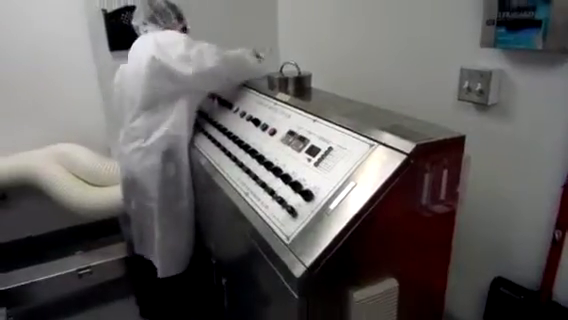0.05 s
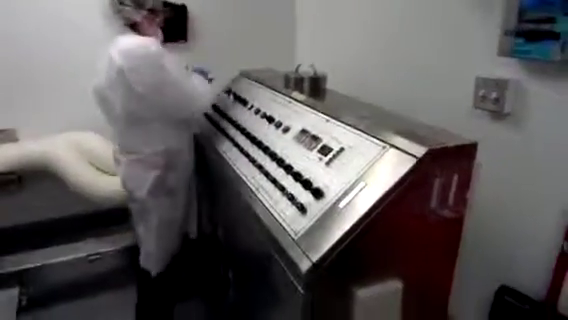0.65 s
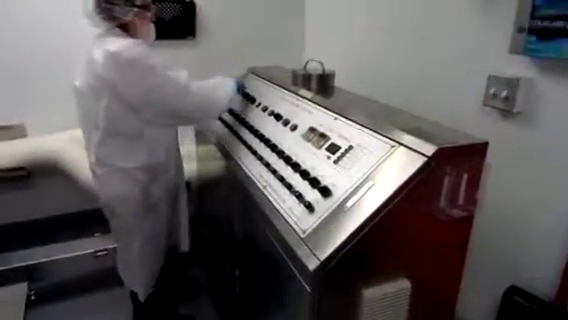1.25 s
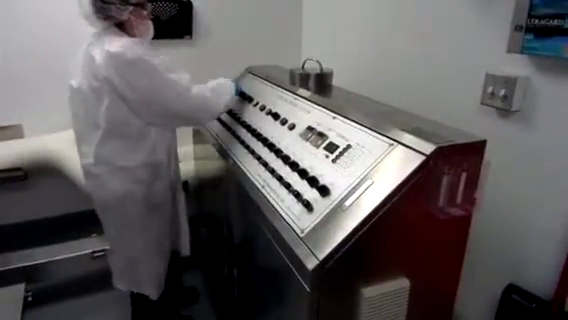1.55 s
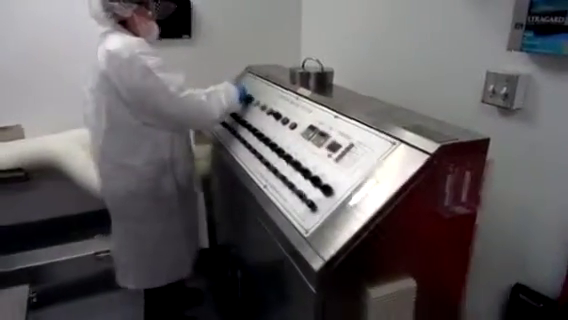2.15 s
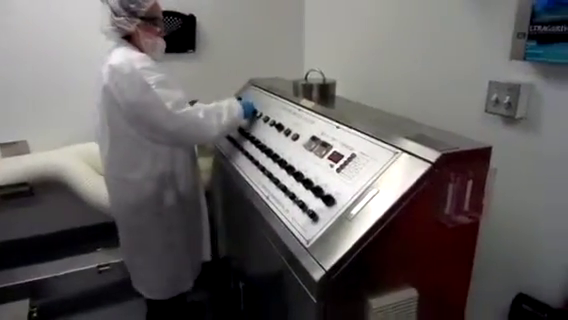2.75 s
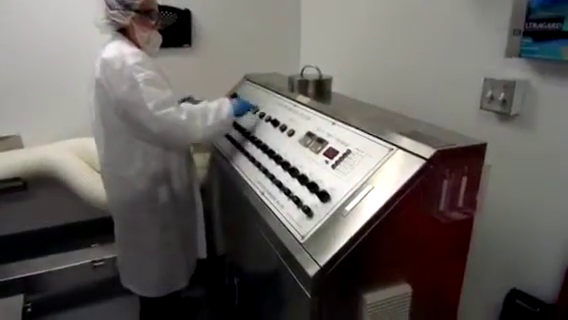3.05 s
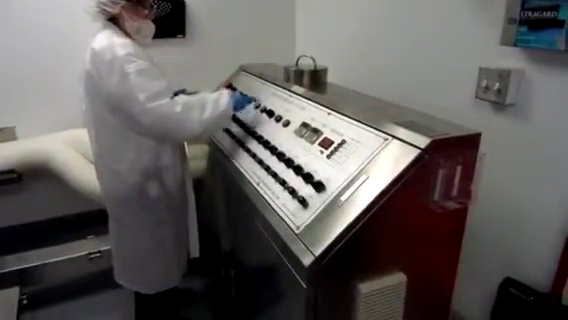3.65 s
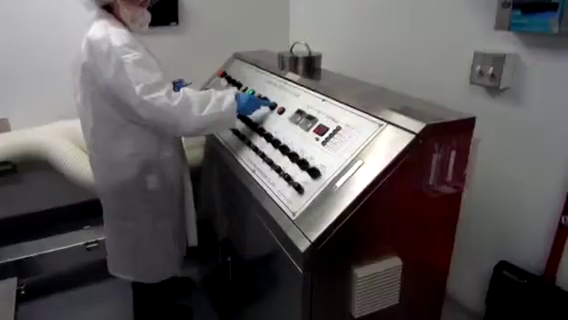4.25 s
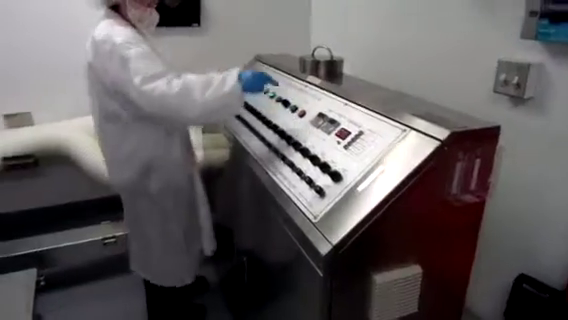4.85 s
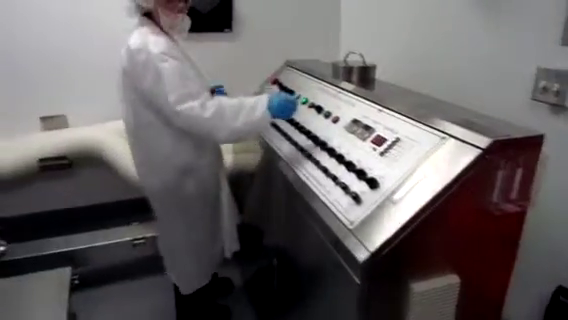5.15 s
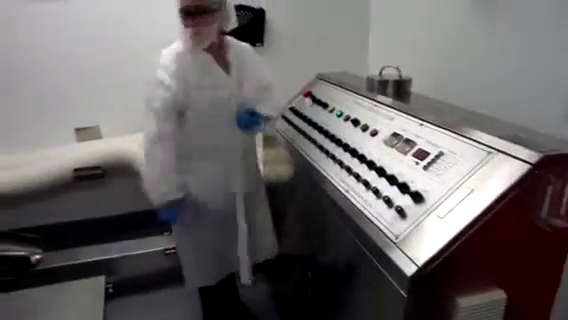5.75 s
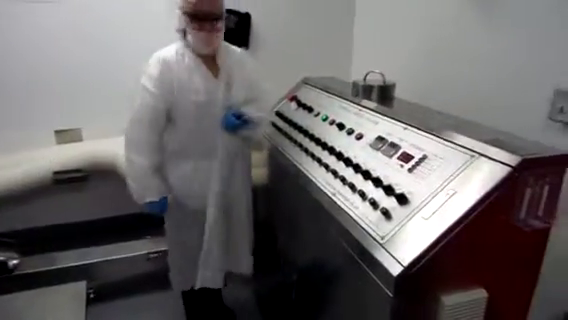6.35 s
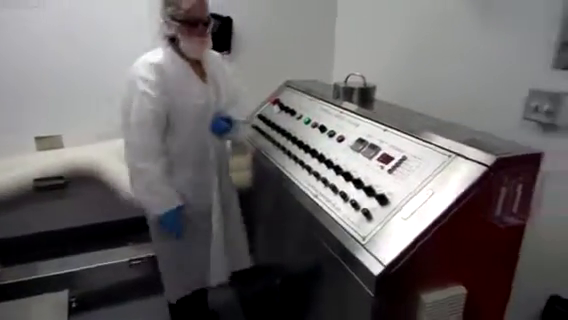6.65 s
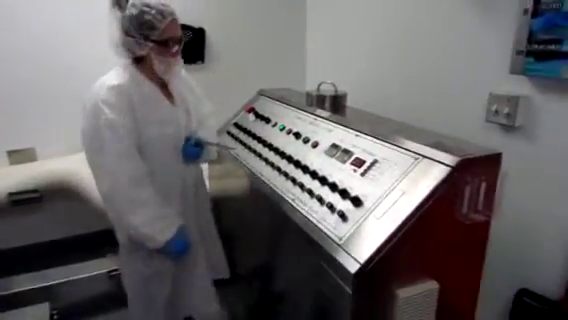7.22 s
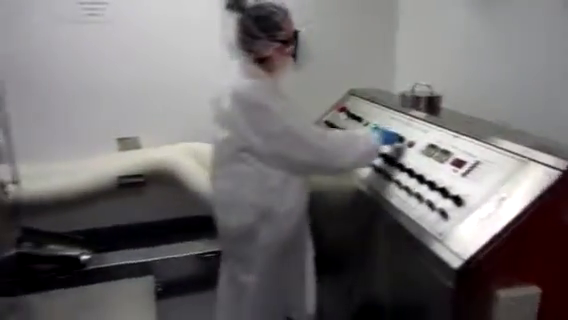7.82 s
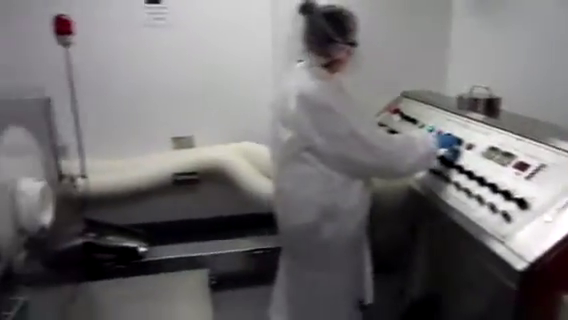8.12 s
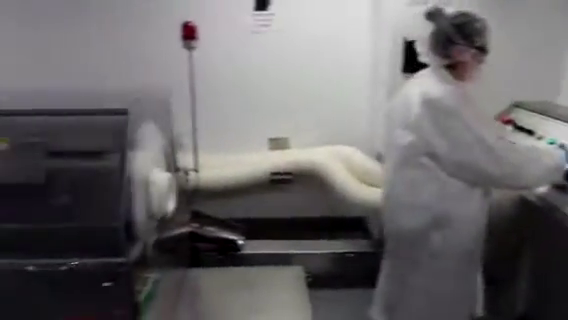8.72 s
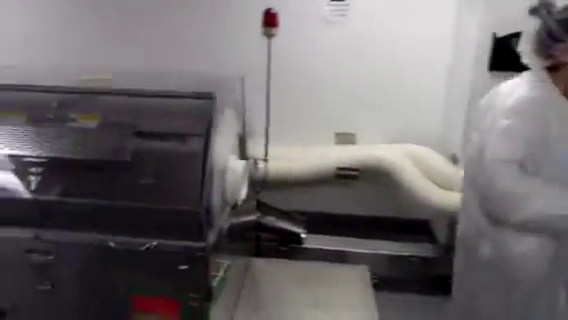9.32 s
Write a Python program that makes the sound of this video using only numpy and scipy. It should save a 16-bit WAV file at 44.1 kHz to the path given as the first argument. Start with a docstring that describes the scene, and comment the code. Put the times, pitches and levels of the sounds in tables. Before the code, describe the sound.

A brief rush of air gives way to the muffled hum and fan whine of an industrial dryer in a small room. From 0.2 to 0.4 seconds, sharp switch clicks and dull knocks shake a steel control desk, with the heaviest thump at about 0.35. The hum dips, then creeps back. A gown rustles faintly, and lighter clicks come at about 0.8, 1.4 and 2 seconds. Around 2.3 seconds, more knocks and a tiny zipping squeak cut the hum almost to silence. It slowly returns under very faint glove scrapes on knobs. At 4 seconds, a click and knock suddenly open the sound into a much louder blower: a steady roar with airy hiss, motor hum and a thin whistle. From about 8.3 seconds the rush surges briefly and keeps growing slightly while the tones sink into it.

```python
"""Industrial dryer and control desk

A dryer hums in a small factory room while an operator in a paper gown works its steel control desk.
Switches click, the desk knocks and shudders, a glove scrapes the knobs. After the early knocks the
hum and rustle duck, then creep back at a steady rate. Motor and fan start muffled; at four seconds
the sound opens into the rush of the blower, which swells to a steady roar."""
import sys
import numpy as np
from scipy import signal
from scipy.fft import rfft, irfft, next_fast_len
from scipy.io import wavfile

SR = 44100
rng = np.random.default_rng(int(sys.argv[2]) if len(sys.argv) > 2 else 0)


def store_wav(level_fs):
    """Save 16-bit WAV to argv[1]."""
    pcm = np.round(np.clip(np.atleast_2d(level_fs), -1, 1) * 32767)
    wavfile.write(sys.argv[1], SR, pcm.T.astype(np.int16))


N = 413658

# motor hum, two close lines that beat, and casing tones: f/Hz, muffled level/dB, open level/dB
MOTOR_LINES = [(117.9, -47, -47.5), (120.4, -42, -41.5), (221.7, -53, -57), (232.6, -50.5, -44),
               (361, -60.5, -64)]
# blade-passing harmonics, first to third: muffled level/dB, open level/dB
BLADE_HARMONICS = [(-38.5, -37.5), (-46.5, -44.5), (-45.5, -47.5)]
# fader ride on the muffled third blade harmonic: t/s, gain/dB
WHINE_RIDE = [(0, -1), (.3, -2.5), (.9, 1.5), (1.2, -3.5), (1.45, -2.5), (2.2, -1.5), (2.35, -13),
              (2.9, -6), (3.15, 3.5), (3.901, 2)]
# noise colours: f/Hz, relative level/dB
DULL_AIR_COLOUR = [(25, -9), (60, -8), (110, -7), (170, -1.5), (250, -2), (320, -7.5), (430, -12.5),
                   (540, -4), (700, -10.5), (830, -10), (1050, -25), (1500, -34.5), (5000, -44.5),
                   (15000, -54)]
ROAR_COLOUR = [(25, -14.5), (50, -12), (78, -3), (115, -3), (150, -4), (230, 1), (350, -3.5), (450, -2.5),
               (620, -5), (1000, -4), (1500, -7.5), (2200, -13), (4000, -27.5), (9000, -43)]
HISS_COLOUR = [(800, -37.5), (2000, 1), (3200, 2), (5000, -0.5), (7000, 0), (10000, -2), (13000, -3),
               (15500, -8)]
CLOTH_COLOUR = [(600, -6.5), (1100, -2), (1500, -7), (2050, 1.5), (2700, -2.5), (3500, 0), (4400, -11),
                (5200, -13.5), (8000, -19), (11000, -31.5), (16000, -32)]
RUMBLE_COLOUR = [(30, -19), (70, 6.5), (130, 9), (250, 5.5), (400, -6), (700, -15), (1200, -16),
                 (2000, -33), (5000, -61)]
# peaks and notches of the casing and the duct: f/Hz, width/Hz, gain/dB
CASING_BANDS = [(2200, 320, 8), (3220, 320, 4.5)]
DUCT_BANDS = [(61.8, 13, -13.5), (86.6, 18, 1.5), (186, 27, 5), (244, 14, 2), (319, 9.4, 6.5),
              (352.4, 9.9, 8), (382.7, 15, 5), (459, 23, -8), (557, 23, 4.5), (636, 19, 4), (740, 54, 2.5),
              (842, 42, 1), (1200, 17, 3), (2450, 17, -1)]
# gown and gloves brushing the desk: t/s, length/s, level/dB, treble lift/dB, relative rumble/dB
RUBS = [(0.17, 0.067, -50.5, 10, 6), (0.263, 0.16, -42.5, -16, 2.5), (0.79, 0.12, -55.5, -2, -8),
        (1.032, 0.032, -63, 5, -6), (1.548, 0.019, -55.5, 2, -6), (1.965, 0.11, -56.5, -1, -4),
        (2.157, 0.067, -55, 8, 3), (3.27, .04, -52.5, 3, 18), (3.734, 0.27, -53, -4, 13.5),
        (3.867, 0.12, -69, -3, 11)]
# switch clicks, hard taps and light ticks: t/s, level/dB, f/Hz, width/octaves, t60/s, relative crack/dB
CLICKS = [(0.1666, -24, 3100, 1.15, 0.018, -3.5), (0.1725, -36, 3100, 0.72, .012, -1),
          (.1955, -42, 3800, 1.4, .012, -6), (0.203, -34, 2000, 1.8, 0.012, -9),
          (.209, -44, 4200, 1.1, .02, -6), (0.221, -43, 3900, 1, .014, -10),
          (0.2932, -35, 3230, 0.43, 0.012, -13), (.339, -28.5, 2410, 0.7, 0.013, -30.5),
          (0.3492, -29.5, 3000, 1.5, 0.0064, -28), (0.3509, -21, 1960, 0.51, 0.012, -36),
          (0.349, -25, 1200, .5, 0.02, -38), (.369, -45, 4530, 1.4, 0.0068, 6),
          (.379, -45, 2000, 1.7, .012, -19), (0.3986, -29, 2520, 1.33, 0.01, -16),
          (.6379, -60, 2400, 0.9, .025, -10), (.7202, -64, 2200, 1.1, .003, 1),
          (0.8002, -43.5, 2570, 1, 0.019, -23), (0.8077, -41.5, 2620, 0.79, 0.037, -29),
          (0.9847, -54, 2300, 1.4, 0.017, -14), (1.259, -54, 2000, 1.5, .006, -6),
          (1.279, -57, 3000, 1.1, .003, 2), (1.408, -39.5, 1780, 0.75, 0.015, -27),
          (2.006, -32, 3540, .8, 0.011, -11), (2.1647, -46, 2405, 1.1, .01, -9.5),
          (2.9497, -66, 2600, 1.7, 0.0027, 0), (3.5074, -67, 2600, 2, 0.0027, 0),
          (3.8095, -61.5, 3250, .3, 0.017, -31), (3.9867, -56, 3100, 0.75, 0.1, -18),
          (4.0092, -29, 595, 1.06, 0.016, -30), (4.012, -38, 2100, 0.85, .012, -17),
          (4.015, -44, 2600, 1.8, .008, -12), (4.0176, -39, 3400, 1.5, 0.007, -14),
          (4.024, -51, 6900, 0.92, 0.23, -14)]
# the desk shaking around the knocks: t/s, length/s, level/dB, relative body/dB
SHUDDERS = [(.171, 0.043, -34, -10), (0.215, 0.082, -42, -17), (0.293, 0.051, -30, -6),
            (0.364, 0.037, -34.5, -10), (2.245, .042, -40, -12), (3.992, 0.027, -38, -3)]
# dull knocks on the desk: t/s, level/dB, contact cut-off/Hz
KNOCKS = [(.174, -26, 300), (0.205, -27, 200), (.3075, -28.5, 500), (0.336, -23, 400), (.3528, -10, 190),
          (0.369, -16, 158), (.381, -15, 170), (0.3961, -19.5, 120), (2.254, -25, 110), (2.274, -35, 139.6),
          (2.2892, -19.5, 172), (3.988, -30, 220), (4.0093, -28, 500)]
# modes of the desk panel: f/Hz, relative level/dB, t60/s
DESK_MODES = [(72, -3, .03), (115, 1, .035), (185, -3, .035), (255, -4, .035), (380, -4, .03),
              (560, -8, .025), (900, -14, .02)]
# ducks after hard knocks: t/s, level at the bottom/dB
DUCKS = [(.21, -9.5), (.37, -14), (2.292, -30)]
# glove on the knobs: t/s, length/s, level before ducking/dB, f/Hz, width/Hz, relative knob body/dB
SCRAPES = [(0.817, 0.065, -58, 4400, 900, -14), (0.896, .03, -56, 3180, 600, -8),
           (1.042, 0.019, -55, 2330, 500, 0), (2.022, 0.072, -69, 3200, 700, -10),
           (2.163, .025, -56, 2250, 500, -12), (2.197, 0.049, -49, 3300, 1300, -11),
           (2.465, .04, -59, 3000, 1200, -10), (2.66, 0.092, -60, 3420, 700, -2),
           (2.788, 0.076, -61, 3500, 1210, -5), (2.892, .04, -59, 3600, 904, -7),
           (2.998, .038, -53.5, 3660, 450, 0), (3.05, 0.068, -49.5, 2950, 1100, -10),
           (3.123, 0.1, -48.5, 3130, 1500, -3)]
# tiny buzzy zips: t/s, length/s, start f/Hz, end f/Hz, level/dB
ZIPS = [(2.254, 0.0086, 7150, 1990, -40), (2.262, 0.0034, 1290, 1900, -40),
        (2.2943, 0.00204, 1400, 1350, -38)]

OPEN_S, OPEN_FADE_S = 4.004, 0.0089   # crossfade from muffled to open
# as the microphone turns towards the dryer, the rush gains and the tones sink into it
TURN_S, RUSH_RISE_DB_PER_S, TONE_FADE_DB_PER_S = 8.34, 1.5, 4


def from_db(db):
    """Decibels to gain."""
    return np.exp(np.log(10) / 20 * np.asarray(db))


def rms_one(x):
    """Scale to unit rms."""
    return x / np.sqrt(np.mean(x ** 2) + 1e-20)


def seconds():
    """The time of every sample."""
    return np.arange(N) / SR


def add(out, s, sound):
    """Mix a sound in at time s."""
    at = round(s * SR)
    out[at:at + len(sound)] += sound[:N - at]


def ramp(s, length):
    """A linear fade from 0 to 1, starting at time s."""
    return np.clip((seconds() - s) / length, 0, 1)


def stroke(s, length, attack_s, release_s):
    """The envelope of one gesture: it takes hold, sustains and dies away."""
    out, t = np.zeros(N), np.arange(int((length + 10 * release_s) * SR)) / SR
    add(out, s, np.minimum(t / attack_s, 1) * np.exp(-np.maximum(t - length, 0) / release_s))
    return out


def drift(rate_hz):
    """A smooth random modulator, rms 1."""
    hop, settle = 40, 2000
    r = np.exp(-2 * np.pi * rate_hz * hop / SR)
    slow = signal.lfilter([1], [1, -2 * r, r * r], rng.standard_normal(N // hop + settle + 2))[settle:]
    return np.interp(np.arange(N) / hop, np.arange(len(slow)), rms_one(slow))


def noise(colour):
    """A steady noise bed of a given colour, rms 1."""
    size = next_fast_len(N)
    hz, db = np.transpose(colour)
    bins = np.maximum(np.fft.rfftfreq(size, 1 / SR), 1)
    gain = from_db(np.interp(np.log(bins), np.log(hz), db)) * np.minimum(bins / hz[0], 1)
    return rms_one(irfft(rfft(rng.standard_normal(size)) * gain, size)[:N])


def fading_noise(t60, size):
    """White noise that dies away."""
    return rng.standard_normal(size) * np.exp(-np.log(1000) * np.arange(size) / SR / t60)


def butter(x, hz, kind, order=2):
    """A low-, high- or band-pass with its edges kept in range."""
    sections = signal.butter(order, np.clip(hz, 10, .45 * SR), kind, fs=SR, output="sos")
    return signal.sosfilt(sections, x + 1e-18)


def ring(x, hz, t60):
    """One mode: a unit impulse starts a decaying sine of height 1."""
    r, w = from_db(-60 / (t60 * SR)), 2 * np.pi * hz / SR
    return signal.lfilter([0, np.sin(w)], [1, -2 * r * np.cos(w), r * r], x + 1e-18)


def resonance(x, hz, width):
    """A band-pass with unity gain at its peak."""
    r, w = np.exp(-np.pi * width / SR), 2 * np.pi * hz / SR
    return signal.lfilter((1 - r * r) / 2 * np.array([1, 0, -1]), [1, -2 * r * np.cos(w), r * r], x)


def equalise(x, bands):
    """Boost or cut narrow bands of a noise; rms 1."""
    return rms_one(x + sum((from_db(db) - 1) * resonance(x, hz, width) for hz, width, db in bands))


def tone(hz, waver_db, flutter):
    """A machine line: it wavers in the room's standing waves and flutters in the air stream."""
    phase = 2 * np.pi * (np.cumsum(hz * np.ones(N)) / SR + rng.random())
    height = np.sqrt(2) * from_db(waver_db * drift(0.51))
    return (height + flutter * drift(9.8)) * np.sin(phase) + flutter * drift(4.2) * np.cos(phase)


def motor(muffled, opened):
    """Beating motor hum and casing tones; higher lines flutter more."""
    out = 0
    for hz, muffled_db, open_db in MOTOR_LINES:
        gain = muffled * from_db(muffled_db) + opened * from_db(open_db)
        out += gain * tone(hz, waver_db=-0.26, flutter=hz / 900)
    return out


def fan(muffled, opened, blade_hz=269.4):
    """Passing blades sing in harmonics, steadier when muffled and rougher in the rush."""
    hz = blade_hz * (1 + 0.00061 * drift(0.77))
    whine_db = np.interp(seconds(), *np.transpose(WHINE_RIDE))
    out = 0
    for k, (muffled_db, open_db) in enumerate(BLADE_HARMONICS, 1):
        ride_db = whine_db if k == 3 else 0
        out += muffled * from_db(muffled_db + ride_db) * tone(k * hz, waver_db=-0.3, flutter=0.19 * k)
        out += opened * from_db(open_db) * tone(k * hz, waver_db=1.3, flutter=0.36 * k)
    return out


def dull_air():
    """A muffled bed of air noise, coloured by the casing."""
    return from_db(-42) * equalise(noise(DULL_AIR_COLOUR), CASING_BANDS)


def blower(rush):
    """Duct turbulence roars and hisses: it leaks through at first, is shut out, then opens fully."""
    leak = stroke(0, length=.205, attack_s=1 / SR, release_s=0.0098)
    duct = equalise(noise(ROAR_COLOUR), DUCT_BANDS)
    swell = from_db(-11) * stroke(8.35, length=0.45, attack_s=.12, release_s=0.08)
    mid_surge = swell * resonance(duct, hz=740, width=370)
    roar = from_db(-30 + .5 * drift(7.9)) * (duct + mid_surge)
    hiss = from_db(-36 + 0.45 * drift(16)) * noise(HISS_COLOUR)
    return (rush + leak * from_db(-14)) * roar + (rush + leak * from_db(-22)) * hiss


def dryer(muffled, opened):
    """Motor, fan, air and a duct whistle, riding the muffled and open faders."""
    turned_s = np.maximum(seconds() - TURN_S, 0)
    tone_fade = from_db(-TONE_FADE_DB_PER_S * turned_s)
    rush = opened * from_db(RUSH_RISE_DB_PER_S * turned_s)
    # each exponent is the dB a layer moves for one dB on its fader
    open_tones = tone_fade * opened ** 0.99
    whistle = from_db(-49.5) * tone_fade * opened ** 0.65 * tone(1049.5, waver_db=2.5, flutter=0.99)
    hum = motor(muffled ** 0.99, open_tones) + fan(muffled ** 1.27, open_tones)
    return whistle + hum + muffled * dull_air() + blower(rush)


def gown(grain_db=1.5, treble_hz=5500, rest_db=-76.5, swing_db=6):
    """The stiff gown rustles in uneven grains; brisk strokes are brighter, heavy ones rumble."""
    cloth = noise(CLOTH_COLOUR) * from_db(grain_db * drift(70))
    body = from_db(rest_db + swing_db * drift(4.4))   # the gown never quite rests
    treble, bass = body.copy(), 0
    for s, length, db, lift_db, rumble_db in RUBS:
        rub = from_db(db) * stroke(s, length, attack_s=0.33 * length, release_s=0.022)
        body += rub
        treble += rub * from_db(lift_db)
        bass += rub * from_db(rumble_db)
    dull = butter(cloth, treble_hz, "low", order=1)
    return bass * noise(RUMBLE_COLOUR) + body * dull + treble * (cloth - dull)


def click(hz, octaves, t60, crack_db, snap_db=-5):
    """A snap and its brief rattle: the struck part rings in one band, with a broadband crack."""
    rattle = fading_noise(t60, size=4096)
    snap = from_db(snap_db) * np.linalg.norm(rattle) * signal.unit_impulse(len(rattle))
    burst = rms_one(rattle + snap) * np.std(rattle)
    body = butter(burst, [hz / 2 ** (octaves / 2), hz * 2 ** (octaves / 2)], "band")
    return rms_one(body) * np.std(burst) + from_db(crack_db) * burst


def switches():
    """Crisp switch clicks and taps on the desk."""
    out = np.zeros(N)
    for s, db, hz, octaves, t60, crack_db in CLICKS:
        add(out, s, from_db(db) * click(hz, octaves, t60, crack_db))
    return out


def room(x, t60=0.5, wet_db=-31, damping_hz=3380):
    """The short diffuse tail that hard walls leave."""
    tail = butter(fading_noise(t60, size=SR // 2), damping_hz, "low")
    return from_db(wet_db) * signal.fftconvolve(x, tail / np.linalg.norm(tail))[:N]


def shudders(body_low_hz=220, body_high_hz=560):
    """The desk shakes: a loose rumble with a boxy body under each group of knocks."""
    rumble = noise(RUMBLE_COLOUR)
    body = rms_one(butter(rng.standard_normal(N), [body_low_hz, body_high_hz], "band"))
    out = 0
    for s, length, db, body_db in SHUDDERS:
        envelope = from_db(db) * stroke(s, length, attack_s=0.0037, release_s=0.0068)
        out += envelope * (rumble + from_db(body_db) * body)
    return out


def knocks(trim_db=-5.5, scatter_db=2.0, low_cut_hz=67):
    """Each knock rings the damped desk panel; a softer contact favours the low modes."""
    blows, panel = np.zeros(N), 0
    for s, db, hz in KNOCKS:
        add(blows, s, from_db(db) * butter(signal.unit_impulse(2048), hz, "low", order=1))
    for hz, db, t60 in DESK_MODES:
        panel -= ring(blows * from_db(db + trim_db + scatter_db * drift(40)), hz, t60)
    return butter(panel, low_cut_hz, "high")


def ducking(fall_s=0.0089, recovery_db_per_s=5.5):
    """A fader that drops fast at each cue and climbs evenly back towards full level."""
    t, db = seconds(), np.zeros(N)
    for s, low_db in DUCKS:
        climb_db = np.minimum(low_db + recovery_db_per_s * (t - s), 0)
        db += ramp(s, fall_s) * (climb_db - db)
    return from_db(db)


def scrapes(slips_per_s=2700, grain_db=2.5, body_low_hz=1100, body_high_hz=2200):
    """A glove sticks and slips on a knob: dense slips ring a narrow rasp over the knob's duller body."""
    slips = rng.standard_normal(N) * (rng.random(N) < slips_per_s / SR)
    slips *= from_db(grain_db * drift(60))
    body = rms_one(butter(slips, [body_low_hz, body_high_hz], "band", order=3))
    out = 0
    for s, length, db, hz, width, body_db in SCRAPES:
        rasp = rms_one(butter(slips, [hz - width / 2, hz + width / 2], "band"))
        envelope = from_db(db) * stroke(s, length, attack_s=0.0052, release_s=0.0069)
        out += envelope * (rasp + from_db(body_db) * body)
    return out


def zips(jitter=.14, crackle_db=-9, harmonics=11):
    """A quick run of tiny uneven slips: a crackling sawtooth whose pitch glides."""
    out = np.zeros(N)
    for s, length, start_hz, end_hz, db in ZIPS:
        hz = np.geomspace(start_hz, end_hz, int(length * SR))
        uneven, crackle = rng.standard_normal((2, 1024))[:, :len(hz)]
        phase = 2 * np.pi * np.cumsum(hz * (1 + jitter * uneven)) / SR
        saw = sum(np.sin(k * phase) / k * (k * hz < SR / 2) for k in range(1, harmonics + 1))
        envelope = from_db(db) * signal.windows.tukey(len(hz), .1)
        add(out, s, envelope * (saw + from_db(crackle_db) * crackle))
    return out


def scene(floor_db=-90):
    """A mono mix over faint hiss: dryer, handling and room tail duck; the desk hits stay up front."""
    level, openness = ducking(), ramp(OPEN_S, OPEN_FADE_S)
    muffled, opened = level * (1 - openness), level * openness
    clicks = switches()
    desk = clicks + knocks() + shudders() + zips()
    handling = muffled * (room(clicks) + gown() + scrapes())   # gone once the blower opens
    mono = dryer(muffled, opened) + desk + handling + from_db(floor_db) * rng.standard_normal(N)
    return np.array([mono, mono])


def record(dry, cutoff_hz=15500):
    """A steep high cut on the whole mix."""
    return signal.sosfilt(signal.ellip(12, .1, 90, cutoff_hz, fs=SR, output="sos"), dry)


dry = scene()
out = record(dry)
store_wav(out)
```